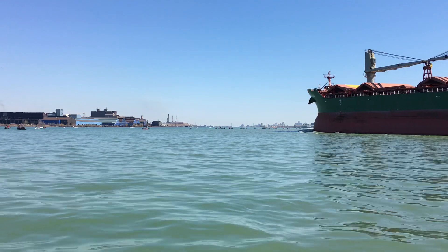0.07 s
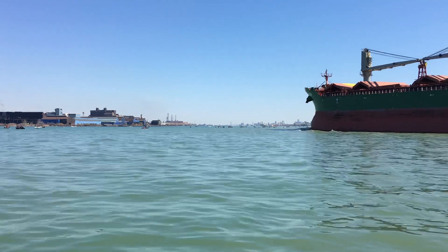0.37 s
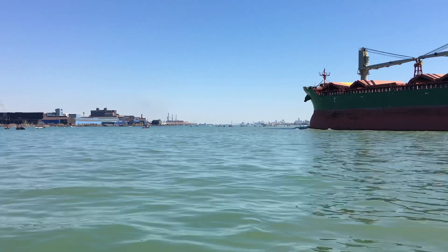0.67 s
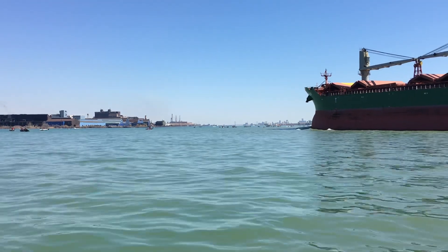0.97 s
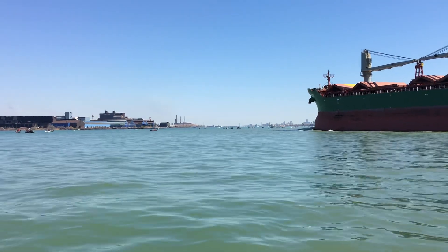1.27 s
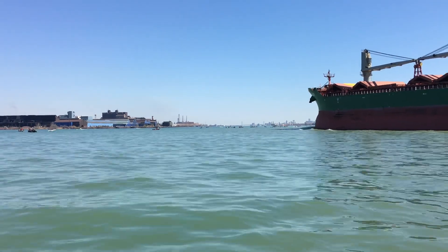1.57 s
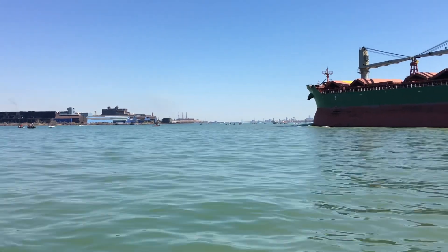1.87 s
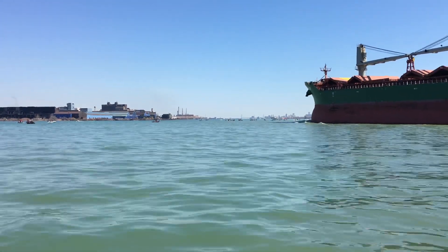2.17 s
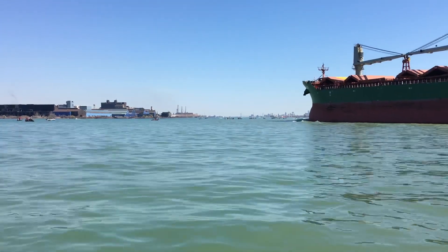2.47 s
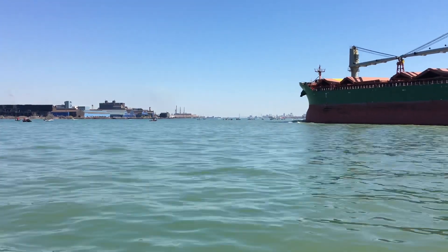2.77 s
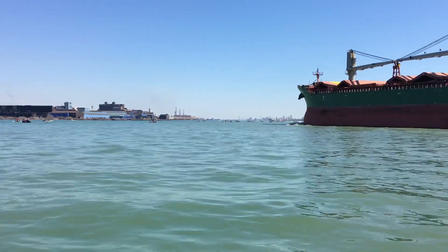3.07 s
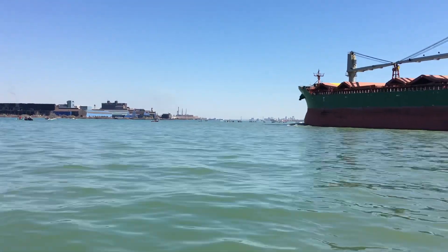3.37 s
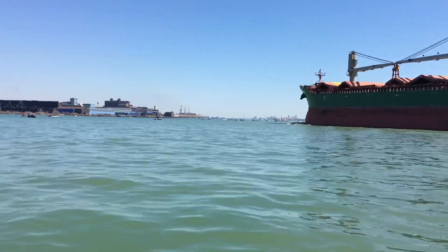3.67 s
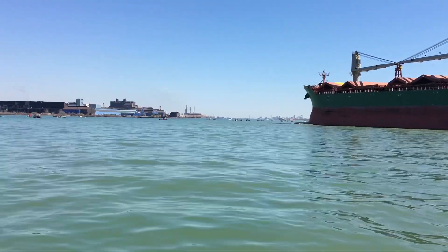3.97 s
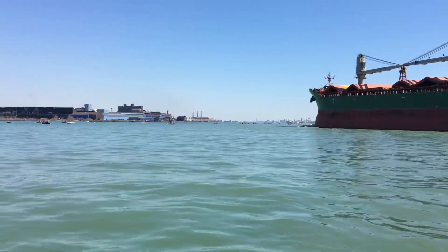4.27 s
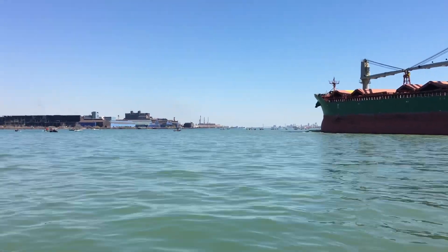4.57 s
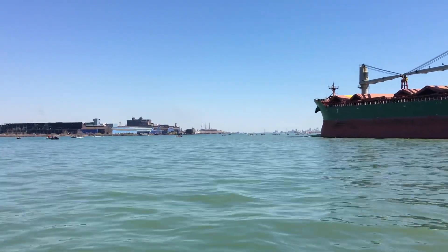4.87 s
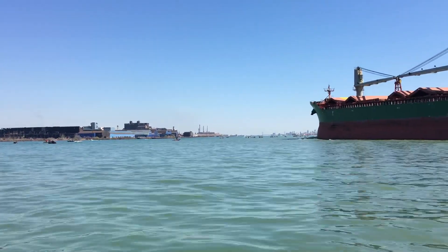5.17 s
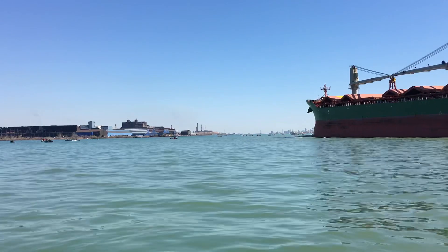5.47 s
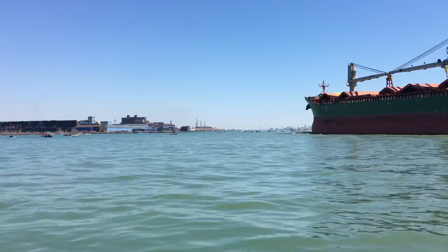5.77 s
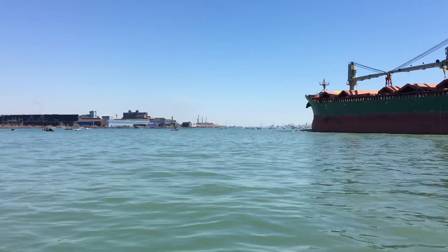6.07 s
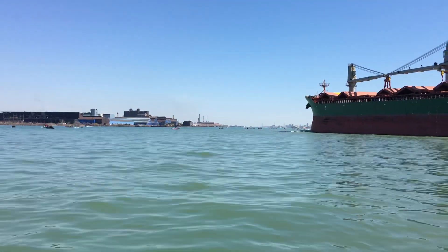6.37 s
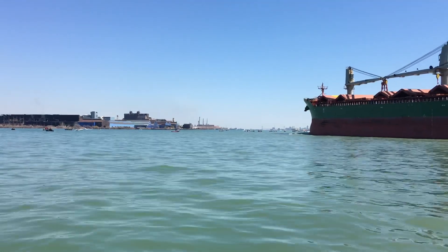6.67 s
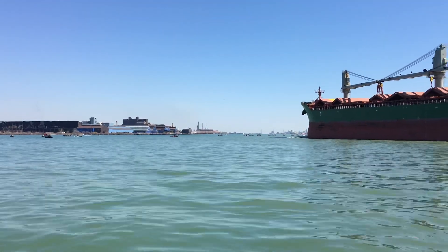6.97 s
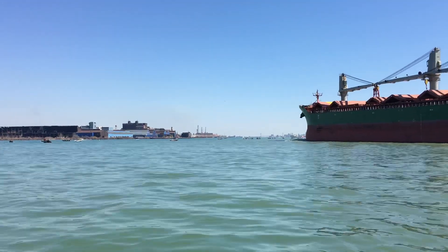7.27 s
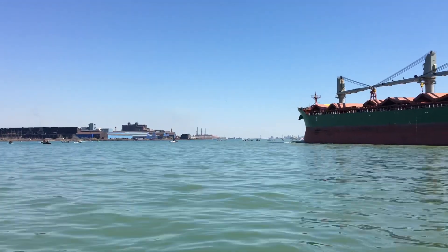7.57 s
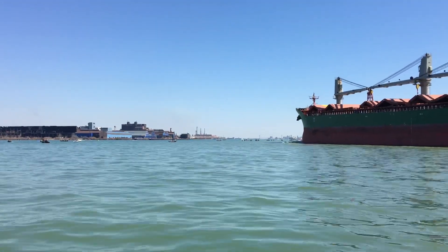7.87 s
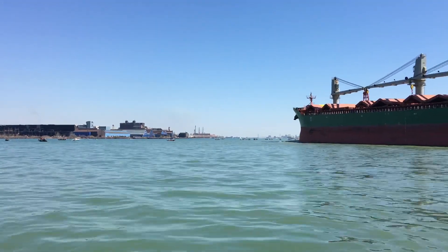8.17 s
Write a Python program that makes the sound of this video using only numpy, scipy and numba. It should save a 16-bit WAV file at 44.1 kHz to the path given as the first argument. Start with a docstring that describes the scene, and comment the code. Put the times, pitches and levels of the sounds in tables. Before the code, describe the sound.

A cargo ship sounds a loud, low, brassy horn over a small boat's throbbing diesel, rumbling wind and washing water.

```python
"""A cargo ship's horn sounds across a river, heard from a small boat with a throbbing diesel.
Wind rumbles, water washes and thumps along the hull, and droplets tick. Late in the scene the horn's
diaphragm chops air into a flared pipe: the note scoops up to a steady low pitch and turns brassy.
The bank returns it late and slightly sharp (the Doppler effect), so the two beat.
Automatic gain control pulls everything down once the blast arrives."""
import sys
import numpy as np
from scipy import signal
from scipy.fft import rfft, irfft, next_fast_len
from scipy.io import wavfile
from scipy.ndimage import map_coordinates
from numba import njit

SR = 44100
rng = np.random.default_rng(int(sys.argv[2]) if len(sys.argv) > 2 else 0)


def master_out(mix):
    """Clip the mix to full scale and print it as 16-bit PCM to the path in sys.argv[1]."""
    frames = np.transpose(np.atleast_2d(mix))
    ceiling = np.clip(frames, -1, 1)
    pcm = np.round(ceiling * 32767).astype(np.int16)
    wavfile.write(sys.argv[1], SR, pcm)


N = 371763
T = np.arange(N) / SR

# The diesel's firing tone and its octave. Each row: time in seconds, level in dB (octave: before its lift).
FIRING_LEVELS = [(0.1, -29.5), (0.3, -37), (0.6, -49), (1.2, -41), (1.4, -54), (2.15, -36), (3.1, -40),
                 (3.5, -31), (5.25, -29.5), (7.6, -34), (8.3, -32.5)]
OCTAVE_LEVELS = [(0.1, -39), (1.05, -31.5), (1.5, -41.5), (2.35, -31.5), (3.3, -30), (4.15, -40.5),
                 (5.4, -29.5), (6.2, -34), (7.05, -37), (8.0, -29), (8.3, -27.5)]
# Weaker tones from unequal cylinders. Each row: multiple of the cycle rate, level in dB.
IMBALANCE_TONES = [(9, -40.5), (10, -37), (11, -37.5), (15, -39.5), (16, -46.5), (17, -41), (18, -47.5)]
# Resonances of hull and fittings. Each row: frequency in Hz, width in Hz, level in dB.
HULL_MODES = [(172, 4, -42.5), (204.8, 8, -47), (229.3, 5, -48), (270.8, 6, -47.5), (358.5, 3, -46.5),
              (535.6, 12, -49), (724, 20, -51.5), (1075, 14, -58), (1430, 16, -57)]
# Noise spectra of wind and water. Each row: frequency in Hz, relative spectral density in dB.
BREEZE_SPECTRUM = [(10, -24), (22, -16), (33, -8.5), (43, -2), (55, 1.5), (100, 2), (150, -3.5), (260, -5),
                   (350, -9), (450, -22.5), (800, -55), (3000, -87.5)]
WASH_SPECTRUM = [(200, -11.5), (420, 0), (600, 1), (740, -1.5), (790, -6), (880, -6.5), (1080, -3),
                 (1400, -7), (2000, -10.5), (2750, -18), (3900, -24), (5000, -33.5), (12000, -78)]
SPRAY_SPECTRUM = [(1500, -15.5), (3000, 0.5), (4300, 0.5), (4850, -4), (5500, -2), (6500, -6), (7400, -12),
                  (8600, -15), (9900, -21), (10500, -26.5), (15500, -36)]
GUST_SPECTRUM = [(12, -23), (30, -6), (45, 6.5), (58, 5), (75, -8), (110, -24.5), (300, -60.5),
                 (3000, -125)]
# Passing waves. Each row: centre and half length in seconds, change of wash and of spray in dB.
PASSING_WAVES = [(1.42, 0.17, 2, -0.2), (1.9, 0.27, 1, -0.2), (2.8, 0.33, 1.5, 1.0), (3.5, 0.16, 1.5, 2.5),
                 (4.08, 0.31, 1.6, 1), (5.33, 0.2, 0.7, 1.1), (6.1, .42, 1.2, 2.5), (6.833, .26, 0.7, 2.3),
                 (7.546, .2, -1, 2)]
# Gusts at the microphone. Each row: centre and half length in seconds, crest level in dB.
WIND_GUSTS = [(.33, 0.087, -30), (3.45, 0.2, -30), (4.402, .4, -37), (5.204, 0.21, -29),
              (5.816, 0.091, -29.5), (7.907, 0.18, -33.5)]
# Nearby droplets. Each row: start in seconds, relative level in dB, decay time in seconds.
DROPLETS = [(1.381, -50, .004), (1.72, -66, .03), (3.25, -61, .01), (3.385, -60, .006), (4.724, -52, .006),
            (7.398, -45, .004), (8.265, -55, .004)]
# Wavelets striking the hull. Each row: centre in seconds, envelope peak in dB, frequency in Hz.
HULL_THUMPS = [(2.399, -17, 112), (3.27, -15, 89), (5.37, -19.5, 70), (6.531, -18.5, 111),
               (6.801, -23, 147), (7.077, -11.5, 92)]
# The horn's harmonics, drifting as the moving ship changes the paths of its sound.
# Each row: harmonic number, relative level at mid-blast in dB, drift in dB per second.
HORN_HARMONICS = [(1, 4, 0.5), (2, 1, -8), (3, -15, 8.5), (4, -14.5, -3.5), (5, -9.5, 4), (6, -9.5, 0),
                  (7, -14.5, 2), (8, -14, 0), (9, -34.5, -10), (10, -35.5, -10), (11, -27.5, -3.5),
                  (12, -30, 13), (13, -27, -5.5), (14, -26.5, 3), (15, -30, -5.5), (16, -26.5, -9.5),
                  (17, -35, -3.5), (18, -35, -4), (19, -36.5, 8), (20, -39, 1), (21, -43, 1.5),
                  (22, -42, -7.5), (23, -39.5, -3.5), (24, -39, -2.5), (25, -44, -7), (26, -40.5, -8.5),
                  (27, -46, -7), (28, -41.5, -7), (29, -41, -4.5), (30, -39.5, 0.5), (31, -46, -11.5),
                  (32, -49.5, -9), (33, -52, 3), (34, -51, -3), (35, -56, -4), (36, -50.5, -1),
                  (37, -53, 4.5), (38, -55.5, -2)]
# Brief dips in bands of the horn's tone.
# Each row: centre and half length in seconds, band centre and half width in Hz, depth in dB.
HORN_DIPS = [(7.32, 0.069, 910, 70, 20), (7.71, 0.34, 520, 70, 6), (7.88, 0.22, 390, 70, 19.5),
             (7.69, 0.16, 1430, 70, 13), (7.66, 0.14, 1690, 70, 12), (8.0, .26, 2080, 70, 8),
             (8, 0.22, 1820, 70, 16), (7.71, 0.12, 2990, 70, 13.5), (7.97, .08, 3850, 120, 10),
             (7.71, .08, 2340, 70, 13), (6.1, .2, 2470, 70, 9), (7.99, .07, 3200, 130, 11),
             (7.42, .09, 4300, 70, 12), (7.25, .11, 1950, 330, 5), (7.25, .15, 3000, 700, 3.5),
             (8.33, .11, 2600, 1100, 6), (7.22, 0.077, 720, 130, 4), (7.2, .06, 1430, 70, 10)]
# Air escaping from the horn. Each row: frequency in Hz, relative spectral density in dB.
AIR_SPECTRUM = [(300, -4), (1800, -1), (2900, -10.5), (3900, -12.5), (4800, -16), (6000, -23),
                (12000, -62)]
# The dull tone of the echo. Each row: frequency in Hz, relative level in dB.
ECHO_SPECTRUM = [(130, -24), (260, -3), (390, -14), (520, -21), (800, -30), (1100, -36)]

HORN_HZ, SCOOP_HZ = 129.82, 9.3  # pitch at full pressure, and how far below it the note starts
# The valve opens; then come the rise times of the note, its overtones, the pressure and the brassy top.
VALVE_S, ATTACK_S, FILL_S, PRESSURE_S, RASP_RISE_S = 7.094, 0.023, 0.032, 0.066, 0.076


def undb(db):
    """Amplitude ratio of a level in decibels."""
    return 10 ** (np.asarray(db) / 20)


def spectral_gain(spectrum, hz):
    """Gain of a spectrum, interpolated in decibels over log frequency."""
    knots_hz, db = np.transpose(spectrum)
    return undb(np.interp(np.log(hz + 1e-3), np.log(knots_hz), db))


def shaped(x, spectrum):
    """Filtering by multiplication of spectra; the result has rms 1."""
    size = next_fast_len(N)
    gain = spectral_gain(spectrum, np.fft.rfftfreq(size, 1 / SR))
    filtered = irfft(rfft(x, size) * gain, size)[:N]
    return filtered / np.sqrt(np.mean(filtered ** 2))


def wander(rate):
    """A smooth random signal with spread near 1, through `rate` values a second."""
    knots = rng.standard_normal(2048)
    coarse = map_coordinates(knots, [T[::64] * rate + 2], order=3, mode="wrap")
    return np.interp(T, T[::64], coarse)


def hump(centre_s, half_s):
    """A Gaussian pulse of height 1."""
    return np.exp(-((T - centre_s) / half_s) ** 2)


def shortfall(rise_s):
    """The horn's starting transient: 1 until the valve opens, then falling to 0 in about rise_s."""
    return np.exp(-(np.maximum(T - VALVE_S, 0) / rise_s) ** 2)


def diesel(cycle_hz=7.53, octave_lift_db=2, waver_db=1.5):
    """Forced vibration: six cylinders fire once a cycle each; their unequal blows shake the hull."""
    cycles = np.cumsum(cycle_hz * (1 + 0.002 * wander(2.22))) / SR
    firing_db = np.interp(T, *np.transpose(FIRING_LEVELS)) + waver_db * wander(6)
    octave_db = np.interp(T, *np.transpose(OCTAVE_LEVELS)) + octave_lift_db + waver_db * wander(7)
    lines = [(6, firing_db), (12, octave_db)]
    lines += [(k, db + waver_db * wander(3.1)) for k, db in IMBALANCE_TONES]
    tones = sum(undb(db) * np.sin(2 * np.pi * (k * cycles + rng.random())) for k, db in lines)
    hull = np.zeros(N)
    for hz, width_hz, db in HULL_MODES:
        phase = 2 * np.pi * hz * T
        hull += undb(db) * (wander(width_hz) * np.sin(phase) + wander(width_hz) * np.cos(phase))
    return np.sqrt(2) * tones + hull


def breeze():
    """Turbulence: a steady wind buffets the microphone with a low rumble."""
    return shaped(rng.standard_normal(N), BREEZE_SPECTRUM) * undb(-28 + wander(16))


def river(grain_db=4):
    """Broadband noise: water washes the hull and bursting bubbles fizz, louder as the ship nears."""
    wash_db = -37 + 0.3637 * T + sum(db * hump(s, half_s) for s, half_s, db, _ in PASSING_WAVES)
    spray_db = -55.5 + 0.7649 * T + sum(db * hump(s, half_s) for s, half_s, _, db in PASSING_WAVES)
    wash = shaped(rng.standard_normal(N), WASH_SPECTRUM) * undb(wash_db + 0.69 * wander(14))
    bubbles = rng.standard_normal(N) * undb(grain_db * rng.standard_normal(N))
    return wash + shaped(bubbles, SPRAY_SPECTRUM) * undb(spray_db + 0.5 * wander(11))


def gusts(flutter_db=2.5):
    """Vortex shedding: each gust leaves eddies at the microphone, a deep, fluttering rumble."""
    strength = sum(undb(db) * hump(s, half_s) for s, half_s, db in WIND_GUSTS)
    return strength * shaped(rng.standard_normal(N), GUST_SPECTRUM) * undb(flutter_db * wander(16))


def droplets(cutoff_hz=9000):
    """Impact noise: each droplet is a bright spit that decays exponentially."""
    envelope = sum(undb(db) * np.exp(-np.abs(T - s) / decay_s) * (T >= s) for s, db, decay_s in DROPLETS)
    highpass = signal.butter(2, cutoff_hz, "high", fs=SR, output="sos")
    return signal.sosfilt(highpass, envelope * rng.standard_normal(N) / 2)


def hull_thumps(width_s=0.0068):
    """Heavy damping: a wavelet's soft push on the hull dies within a few cycles."""
    return sum(undb(db) * np.exp(-((T - s) / width_s) ** 2 / 2) * np.sin(2 * np.pi * hz * (T - s))
               for s, db, hz in HULL_THUMPS)


def dip_db(hz):
    """Attenuation over time of the horn's harmonic at this frequency."""
    return sum(db * hump(s, half_s) for s, half_s, centre_hz, half_hz, db in HORN_DIPS
               if abs(hz - centre_hz) < half_hz)


def horn(cycles, gain_db=-12.5, fade_db_per_s=1.1, rasp_hz=1250, swell_hz=560):
    """Nonlinear steepening: a diaphragm chops air into a flared pipe; full pressure turns it brassy."""
    dull_db_per_octave = 10.5 * shortfall(FILL_S)
    rasp_db = 1.5 - 29 * shortfall(RASP_RISE_S)
    swell_db = 1.2 * hump(7.63, 0.11)
    boom = hump(7.158, 0.034)
    from_middle_s = T - T[T > VALVE_S].mean()
    tone = np.zeros(N)
    for k, db, drift_db_per_s in HORN_HARMONICS:
        hz = k * HORN_HZ
        source_db = db - dull_db_per_octave * np.log2(k)
        source_db += rasp_db / (1 + (rasp_hz / hz) ** 8)  # acts above rasp_hz
        source_db += swell_db / (1 + (swell_hz / hz) ** 8)
        source_db += max(1.9 - 0.5 * (k - 1), 0) * boom  # the lowest harmonics boom at the onset
        path_db = drift_db_per_s * from_middle_s - dip_db(hz)
        # Moving air scatters short waves most, in level and in phase.
        exposure = min(k / 12, 1)
        scatter_db = exposure * (1.3 * wander(5) + 1.7 * wander(22))
        scattered_cycles = k * cycles + exposure * 0.18 * wander(1.993)
        tone += undb(source_db + path_db + scatter_db) * np.sin(2 * np.pi * scattered_cycles)
    # A puff of air escapes once a cycle, hardest just as the note reaches its pitch.
    puffs = rng.standard_normal(N) * (1 + np.cos(2 * np.pi * cycles))
    air_gain = undb(-34 + rasp_db + swell_db) + undb(-25) * hump(VALVE_S + 0.106, 0.028)
    envelope = (1 - shortfall(ATTACK_S)) * undb(gain_db - fade_db_per_s * np.maximum(T - VALVE_S, 0))
    return envelope * (tone + air_gain * shaped(puffs, AIR_SPECTRUM))


def bank_echo(cycles, arrival_s=7.265, full_s=7.93, doppler_hz=3.55, waver_db=5):
    """Doppler effect: the ship steams towards the bank, so its dull echo returns a little sharp."""
    swell_db = -20 - 19.5 * np.maximum(full_s - T, 0)
    onset = np.clip((T - arrival_s) / ATTACK_S, 0, 1)
    shifted_cycles = cycles + doppler_hz * (T - arrival_s)
    tone = np.zeros(N)
    for k in range(1, 9):
        gain = spectral_gain(ECHO_SPECTRUM, k * HORN_HZ) * undb(waver_db * wander(9.2))
        tone += gain * np.sin(2 * np.pi * k * shifted_cycles)
    return np.sqrt(2) * undb(swell_db) * onset * tone


def scene():
    """Superposition of ship, boat, wind and water; the horn's pitch rises with its air pressure."""
    pitch_hz = HORN_HZ - SCOOP_HZ * shortfall(PRESSURE_S)
    cycles = np.cumsum(pitch_hz * (1 + 0.00057 * wander(30))) / SR
    ship = horn(cycles) + bank_echo(cycles)
    return (ship + diesel() + breeze() + river() + gusts() + hull_thumps() + droplets())[None]


@njit
def follow(x, attack, release):
    """Envelope detection: a one-pole smoother with separate rates for rising and sinking."""
    envelope, level = np.empty(len(x)), 0.
    for i in range(len(x)):
        level += (x[i] - level) * (attack if x[i] > level else release)
        envelope[i] = level
    return envelope


def record(dry, threshold_db=-13.5, slope=0.51, attack_s=0.054, release_s=1.0, cutoff_hz=15700):
    """Compression: gain control turns loud sound down, and a low-pass filter cuts the top."""
    envelope = follow(np.abs(dry[0]), 1 / (attack_s * SR), 1 / (release_s * SR))
    gain = np.maximum(envelope / undb(threshold_db), 1) ** -slope
    onset = np.clip((T - 0.036) / 0.002, 0, 1)  # an abrupt start after a split second of silence
    lowpass = signal.ellip(8, 0.2, 70, cutoff_hz, fs=SR, output="sos")
    return signal.sosfilt(lowpass, dry * gain * onset)


dry = scene()
out = record(dry)
master_out(out)
```